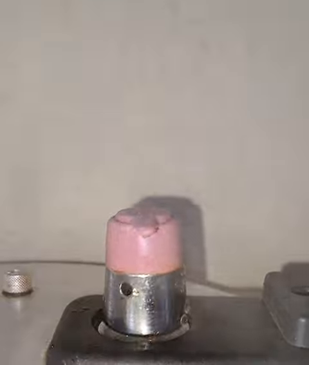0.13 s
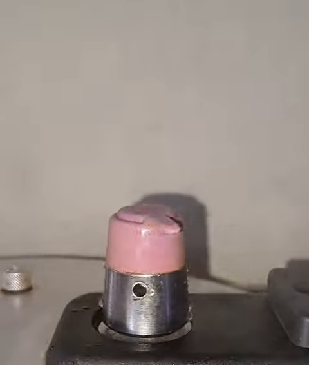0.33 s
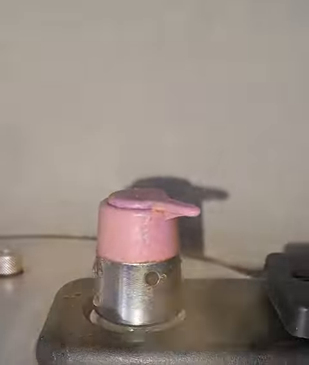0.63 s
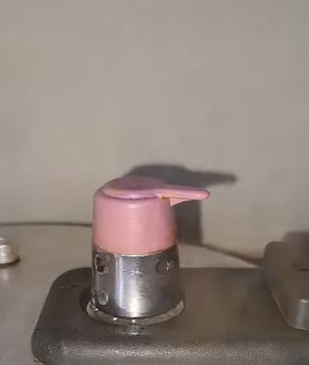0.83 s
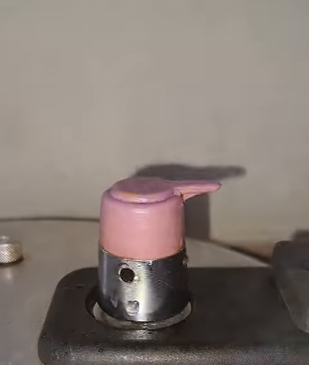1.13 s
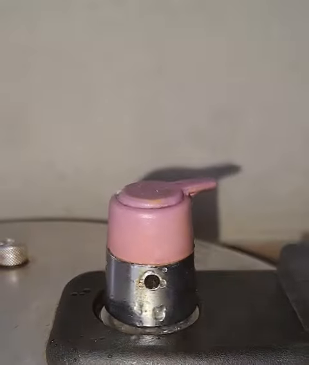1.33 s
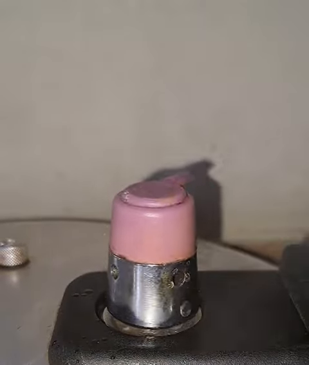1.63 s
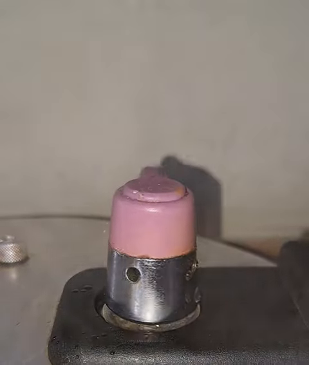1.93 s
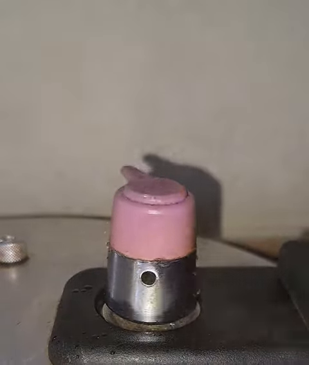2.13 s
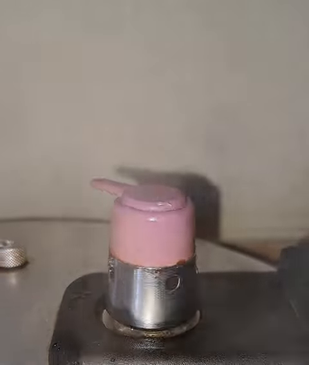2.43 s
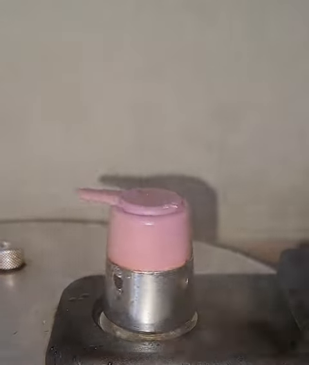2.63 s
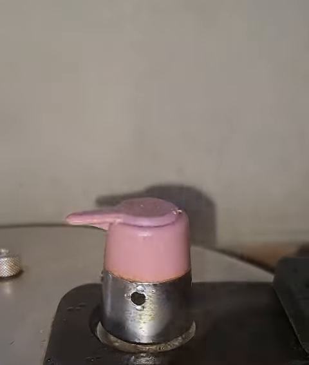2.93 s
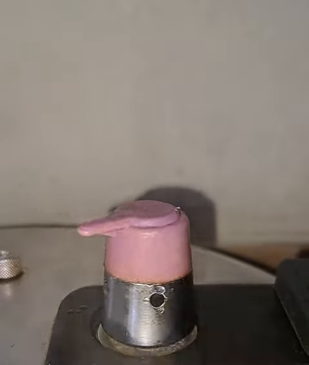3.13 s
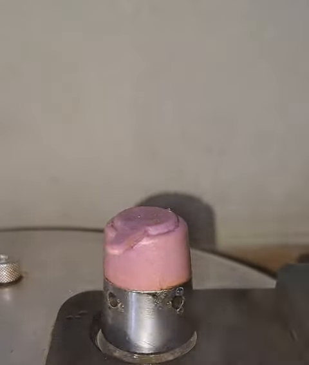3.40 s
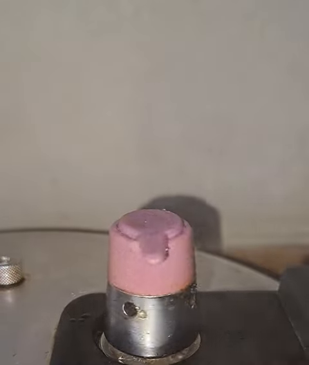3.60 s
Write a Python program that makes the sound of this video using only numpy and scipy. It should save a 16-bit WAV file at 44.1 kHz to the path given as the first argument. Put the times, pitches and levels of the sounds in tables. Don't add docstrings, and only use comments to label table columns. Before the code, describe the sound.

A pressure cooker's steam vent hisses close to a phone in a kitchen, rough and wet with spits and low puffs at first, then drier, surging and choking in quick bursts as the weight turns.

```python
import sys
import numpy as np
from scipy import signal
from scipy.fft import rfft, irfft, next_fast_len
from scipy.io import wavfile
from scipy.ndimage import uniform_filter1d, map_coordinates

SR = 44100
rng = np.random.default_rng(int(sys.argv[2]) if len(sys.argv) > 2 else 0)


def generate_wav(sig):
    pcm = np.round(np.clip(np.atleast_2d(sig).T, -1, 1) * 32767).astype(np.int16)
    wavfile.write(sys.argv[1], SR, pcm)


def amplitude_ratio(level_db):
    exponent = np.asarray(level_db, float) / 20
    return 10 ** exponent


N = 165816
TIME_S = np.arange(N) / SR

# time_s, level_db, turn of the holes (0 to 4), brightness_db, wetness_db
JET_COURSE = [(.11, -24, 0.28, 0, -6), (.44, -23, 0.23, 0.5, -6.5), (.77, -19.5, 0.32, 1.5, -6.5),
              (1.07, -18.5, 0.27, 1.5, -6.5), (1.44, -23, 0.45, -1.5, -5.5), (1.77, -20.5, 0.46, 1.5, -9),
              (2.03, -25.5, 0.72, 0.5, 1.5), (2.12, -24.5, 0.7, 0.5, -30), (2.43, -18, 0.97, 0.5, -6.5),
              (2.76, -15.5, 0.9, -0.5, -28), (3.1, -26.5, 0.94, -2, -9.5), (3.43, -19, 3.7, 0.5, -11),
              (3.76, -19.5, 3.2, 0, -14)]


def unit(x):
    return x / np.sqrt(np.mean(x ** 2) + 1e-20)


def along(points, hz):
    point_hz, value = np.transpose(points)
    return np.interp(np.log(hz + 1), np.log(point_hz + 1), value)


def control(column, t):
    course = np.transpose(JET_COURSE)
    return np.interp(t, course[0], course[column])


def wobble(hz):
    return map_coordinates(rng.standard_normal(4 * N // 100), [np.arange(N) * hz / SR])


def patches(shape, rows, columns):
    field = uniform_filter1d(rng.standard_normal(shape), size=rows, axis=-2)
    return unit(uniform_filter1d(field, size=columns, axis=-1))


def filtered(x, response):
    m = next_fast_len(N + SR // 2)
    return irfft(rfft(x, m) * response(np.fft.rfftfreq(m, 1 / SR)), m)[..., :N]


def frames(x):
    return signal.stft(x, SR, nperseg=256, noverlap=192)


def sound(z, colour):
    x = signal.istft(z, SR, nperseg=256, noverlap=192)[1][:, :N]
    return filtered(x, colour)


def at_ports(envelope):
    # pitch_hz, left lead_rad at the start, and turned,
    # share common to both ports (0-1) at the start, and turned
    port_paths = [(60, .1, .1, .8, .7), (750, .9, .7, .6, .6), (1030, .4, .2, .55, .6),
                  (1500, 2.2, 2.2, .92, .92), (1850, 2.7, 2.5, .65, .55), (2080, 2.2, 1, .1, .2),
                  (2300, 1.7, 1.8, .5, .65), (2800, 2.7, 2.7, .8, .85), (3150, 3.05, 2, .55, .25),
                  (3550, 3.4, 3.3, .6, .9), (3850, 3.8, 3.2, .5, .995), (4120, 4.6, 3.0, .35, .75),
                  (4600, 4.1, 3.8, .55, .5), (5150, 5.8, 5.5, .35, .2), (5700, 5.7, 6, .65, .75),
                  (6500, 5, 2.2, .3, .6), (7200, 6, 4.8, .2, .4), (7800, 7.2, 6.9, .7, .7),
                  (8600, 9.4, 8, .8, .4), (10300, 11.3, 11, .5, .4), (11600, 12.6, 11.7, .75, .4),
                  (16000, 21, 17, .6, .5)]
    hz, t, z = frames(rng.standard_normal((3, N)) * envelope)
    path_hz, *columns = np.transpose(port_paths)
    lead, lead_turned, share, share_turned = (np.interp(hz, path_hz, c)[:, None] for c in columns)
    hz = hz[:, None]
    turn = np.interp(control(2, t), (.3, .95), [0, 1])
    share = np.clip(share + (share_turned - share) * turn ** 2, 0, 1)
    drift = .007 * (hz / 1000) ** 2 * patches(z[0].shape, rows=3, columns=600)
    lead = lead + (lead_turned - lead) * turn + drift
    common = z[0] * np.exp([.5j * lead, -.5j * lead])
    return hz, t, np.sqrt(1 - share) * z[1:] + np.sqrt(share) * common


def bursts(events, half_s, colour):
    envelope = sum(amplitude_ratio(db) * np.exp(-((TIME_S - s) / half_s) ** 2) for s, db in events)
    return sound(at_ports(envelope)[2], lambda hz: amplitude_ratio(along(colour, hz)))


def kitchen(x):
    # pitch_hz, t60_s
    decay = [(200, 0.4), (2000, 0.35), (12000, 0.035)]
    hz, t, z = signal.stft(rng.standard_normal((2, SR // 2)), SR, nperseg=256)
    fall_db = -60 * t / along(decay, hz)[:, None]
    tail = signal.istft(z * amplitude_ratio(fall_db), SR, nperseg=256)[1]
    delayed = np.pad(x, ((0, 0), (300, 0)))
    return signal.fftconvolve(delayed, tail / np.linalg.norm(tail[0]), axes=1)[:, :N]


def damp_puffs():
    # time_s, level_db
    puff_times = [(.22, -55), (.47, -56), (.58, -51), (.7, -54), (.9, -55), (1.08, -67), (1.27, -53),
                  (1.4, -54), (1.58, -49), (1.68, -49), (1.8, -54), (1.88, -52), (1.98, -59), (2.21, -71),
                  (2.63, -65), (2.83, -68), (3.11, -58), (3.75, -64)]
    # pitch_hz, level_db
    puff_colour = [(8, -22), (20, -15), (60, 0), (120, -8), (250, -32)]
    return amplitude_ratio(24.5) * bursts(puff_times, 0.024, puff_colour)


def spatter():
    # pitch_hz, level_db
    spatter_colour = [(10, -38), (40, -19), (130, 14), (300, 6), (800, -46), (2500, -38)]
    lumps = amplitude_ratio(4 * wobble(44.9))
    drops = sound(at_ports(lumps)[2], lambda hz: amplitude_ratio(along(spatter_colour, hz)))
    return amplitude_ratio(-48 + control(4, TIME_S)) * unit(drops)


def spits():
    # time_s, level_db
    spit_times = [(1.112, -14), (1.161, -18), (1.205, -16), (1.582, -16), (1.794, -16), (1.906, -18),
                  (0.591, -15.5), (.648, -19.5), (.716, -22.5), (.773, -34), (.94, -20.5), (1.534, -26),
                  (1.629, -21), (1.716, -18), (1.985, -21), (2.093, -26), (2.204, -22.5), (2.495, -28)]
    # pitch_hz, level_db
    spit_colour = [(100, -21), (500, -7.5), (1200, -4.5), (2400, -1), (4000, -11.5), (8000, -39)]
    return bursts(spit_times, 0.0035, spit_colour)


def humps(rows, t, late):
    total_db = 0
    for s, db, half_s in rows:
        side_s = half_s * (1 + late * np.sign(t - s))
        total_db = total_db + db * np.exp(-np.abs((t - s) / side_s) ** 2.28)
    return total_db


def rocking_weight(t):
    # time_s, rise_db, half_length_s
    spurts = [(0.188, 5.5, 0.0087), (0.231, 1.5, 0.013), (0.283, 2, 0.0078), (.325, 0.5, 0.0082),
              (0.433, 2, 0.025), (.51, 0.5, 0.027), (.665, -1, 0.01), (.775, 2.5, 0.0056),
              (.855, 0.5, 0.008), (0.592, 5, 0.011), (0.941, 4, 0.0047), (0.994, 5.5, 0.004),
              (1.115, 3, 0.0074), (1.215, 2, 0.011), (1.397, 2, 0.033), (1.489, 7, 0.0044),
              (1.535, 6.5, 0.0022), (1.583, 2, 0.022), (1.645, 3, 0.0091), (1.695, 3, 0.022),
              (1.745, 0.5, 0.013), (1.795, -8, 0.0038), (1.906, 3, 0.014), (1.994, 3.5, 0.036),
              (2.085, 2, 0.012), (2.66, -0.5, 0.02), (2.891, 3.5, 0.034), (2.98, 5, 0.048),
              (3.094, 6.5, 0.028), (3.165, 6.5, 0.03), (3.26, 5, 0.0078), (3.52, 3, 0.0093),
              (3.632, 0, 0.033)]
    # time_s, depth_db, half_length_s
    chokes = [(0.392, 2, 0.026), (0.465, 5, 0.014), (0.56, 3.5, 0.021), (0.633, 5.5, 0.0071),
              (0.737, 4, 0.031), (0.808, 5, 0.018), (0.892, 3.5, 0.015), (0.968, 3.5, 0.03),
              (1.031, 2.5, 0.05), (1.074, 4, 0.014), (1.145, 3, 0.018), (1.345, 2, 0.0078),
              (1.455, 0.5, .01), (1.515, 0, 0.007), (1.615, 2, 0.0068), (1.865, 3, 0.0036),
              (1.713, 8.5, 0.01), (1.769, 2, 0.015), (2.212, 4, 0.04), (2.34, 4.5, 0.022),
              (2.397, 4.5, 0.0087), (2.449, 10.5, 0.028), (2.531, 11, 0.017), (2.625, 12, 0.016),
              (2.744, 10.5, 0.036), (2.831, 11, 0.016), (2.934, 7.5, 0.017), (3.02, 2, 0.047),
              (3.137, 4, 0.014), (3.234, -2, 0.0053), (3.374, 3.5, 0.042), (3.493, 6, 0.027),
              (3.586, 4.3, 0.022), (3.678, 9.5, 0.018), (3.76, 8, 0.013)]
    linger = 0.17
    return humps(spurts, t, linger) - humps(chokes, t, -linger)


def port_db(port, rings, hz, turn):
    colour_db = along(port, hz)
    for ring_hz, width_hz, *levels_db in rings:
        level_db = np.interp(turn, (.3, .75, 1.5), levels_db)
        colour_db = colour_db + level_db * np.exp(-((hz - ring_hz) / width_hz) ** 2)
    return colour_db


def hollows(hz, turn):
    # pitch_hz, level_db
    left_port = [(300, -8.0), (1000, -11.5), (2500, -3.5), (4700, -6.0), (8000, -1.0), (10000, -3.0),
                 (12500, 4.5), (15700, 2.0)]
    right_port = [(300, -7.0), (1000, -12.0), (2500, -7.0), (4700, -4.0), (8000, -0.5), (10000, -13.0),
                  (12500, -4.0), (15700, 0.0)]
    # pitch_hz, width_hz, start_db, turned_once_db, turned_twice_db
    left_rings = [(880, 130, 3.5, 4.0, 2.0), (1480, 130, 4.5, 2.0, 2.0), (2140, 130, -2.0, -1.5, -1.5),
                  (2380, 200, 2.0, -1.0, -0.5), (3160, 200, -2.0, -4.0, -3.5), (3820, 300, -0.5, 3.0, 4.5),
                  (4300, 200, 4.0, -0.5, 2.5), (5500, 200, 1.5, 4.5, 2.0), (6580, 200, -2.0, -1.5, 2.5),
                  (7780, 300, 1.5, 2.5, -2.5), (8740, 450, -3.5, -0.5, -4.5), (12040, 200, 1.5, -5.5, -4.0),
                  (13420, 700, 3.5, -2.0, 0.0), (14620, 300, 0.0, -2.5, 2.5)]
    right_rings = [(700, 300, -2.0, -2.5, -4.0), (1180, 130, -0.0, 1.5, 3.0), (1420, 200, 7.0, 6.0, 5.5),
                   (1900, 130, -1.5, -3.5, -5.0), (2320, 130, -0.0, 4.0, 5.5), (3400, 300, 1.5, 5.0, 6.5),
                   (4120, 450, -0.5, 2.0, 3.5), (5260, 300, -0.5, 8.5, 6.5), (5560, 130, 1.5, 2.5, -1.5),
                   (6340, 300, -2.0, 4.0, 1.0), (7780, 450, 2.5, 6.5, 3.5), (8500, 300, 1.0, 2.5, -2.5),
                   (11500, 300, 4.0, 3.0, 3.0), (13780, 450, -2.0, -3.0, -2.5)]
    return np.array([port_db(left_port, left_rings, hz, turn), port_db(right_port, right_rings, hz, turn)])


def steam_jet():
    # pitch_hz, share
    swing = [(200, 0.75), (1000, 1), (4000, 1.28), (8000, 1.05), (13000, 1.6)]
    # pitch_hz, share
    bright = [(3000, -0.9), (9000, 0.72), (12000, 0.86)]
    low_cut_hz, low_cut_order = 200, 1.44
    flutter_db = 0.5 * wobble(257.5)
    sway_db = .8 * wobble(34.6)
    hz, t, z = at_ports(amplitude_ratio(flutter_db + sway_db))
    gain_db = 1 + hollows(hz, control(2, t)) + control(1, t)
    gain_db = gain_db + along(swing, hz) * rocking_weight(t)
    gain_db = gain_db + along(bright, hz) * control(3, t)
    gain_db = gain_db + 1 * patches(z[0].shape, rows=4, columns=40)
    gain_db = gain_db + 1.7 * patches(z.shape, rows=2, columns=90) * (hz > 4300)
    gain_db = gain_db + 0.53 * control(4, t) * np.exp(-hz / 463)
    return sound(z * amplitude_ratio(gain_db), lambda f: (1 + (low_cut_hz / (f + 1)) ** 2) ** -low_cut_order)


def scene():
    near = damp_puffs() + spatter() + spits() + steam_jet()
    return near + amplitude_ratio(-17) * kitchen(near)


def wind_filter(x):
    # start_s, end_s, below_hz
    bass_cuts = [(1.63, 1.655, 70), (1.77, 1.79, 120), (2.085, 2.11, 150), (2.11, 2.135, 380),
                 (2.135, 2.17, 200), (2.238, 2.262, 290), (2.262, 2.32, 100), (2.36, 2.385, 180),
                 (2.555, 2.61, 140), (2.66, 2.71, 200), (2.71, 2.81, 110), (2.865, 2.897, 280),
                 (2.897, 2.97, 80), (3, 3.03, 120), (3.24, 3.27, 140), (3.27, 3.44, 85), (3.62, 3.655, 150),
                 (3.705, 3.73, 250)]
    fade_s = .006
    removed = 0
    for a, b, cut_hz in bass_cuts:
        shut = np.interp(TIME_S, [a - fade_s, a + fade_s, b - fade_s, b + fade_s], [0, 1, 1, 0])
        removed = removed + shut * filtered(x, lambda hz: 1 / (1 + (hz / cut_hz) ** 10))
    return x - removed


def band_limit(x):
    return signal.sosfilt(signal.butter(12, 15750, fs=SR, output="sos"), x)


def record(dry):
    limited = filtered(wind_filter(dry), lambda hz: hz < 15750)
    opened = np.arange(N) >= .1112 * SR
    return band_limit(limited * opened)


dry = scene()
out = record(dry)
generate_wav(out)
```